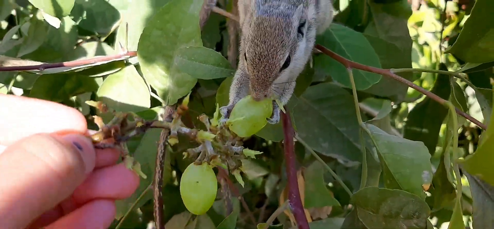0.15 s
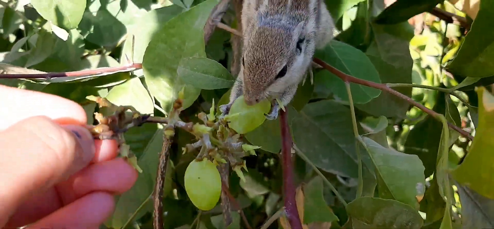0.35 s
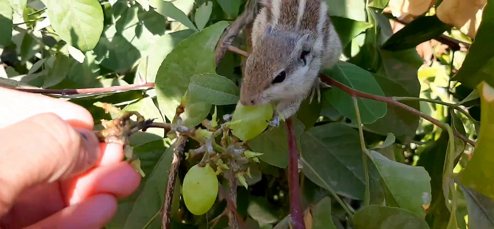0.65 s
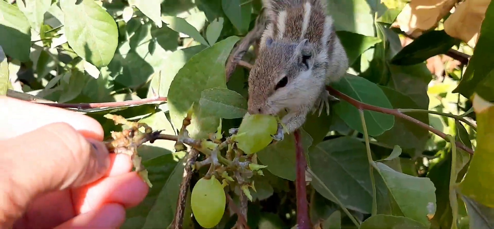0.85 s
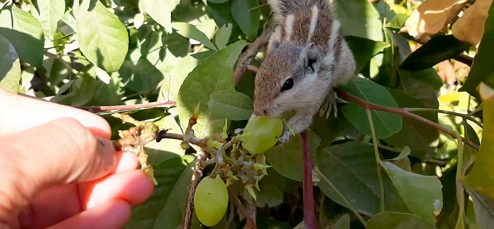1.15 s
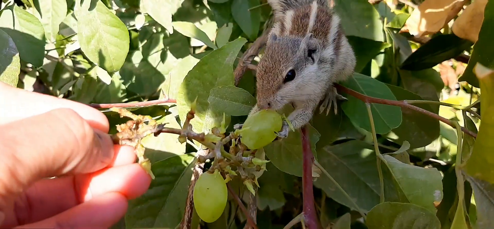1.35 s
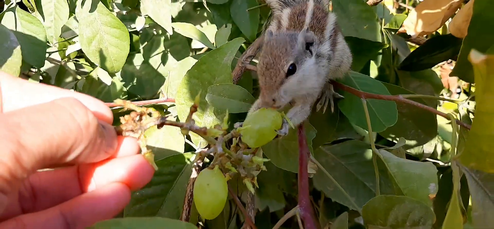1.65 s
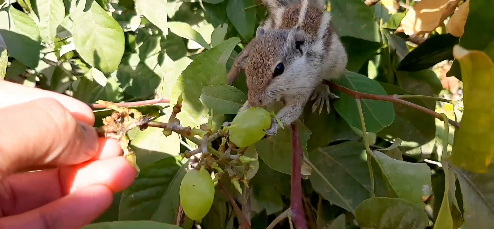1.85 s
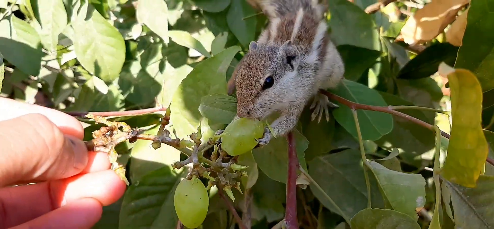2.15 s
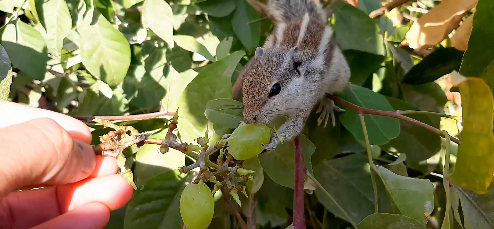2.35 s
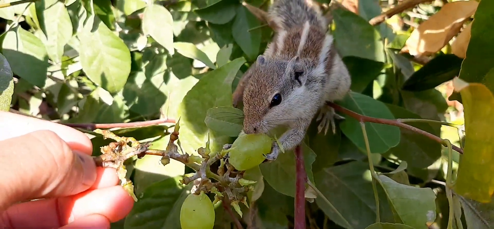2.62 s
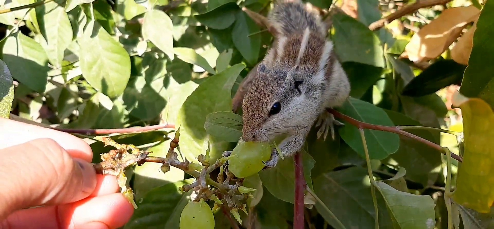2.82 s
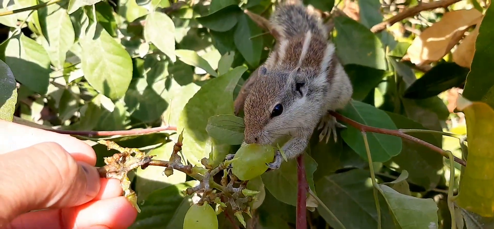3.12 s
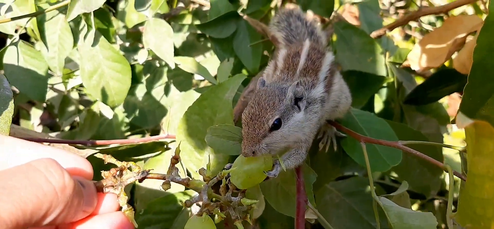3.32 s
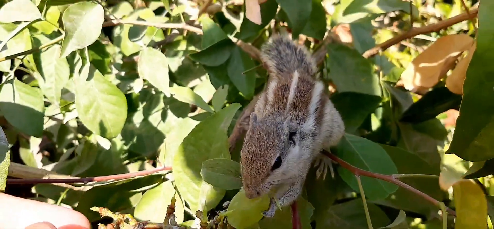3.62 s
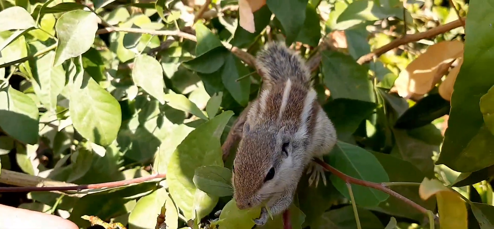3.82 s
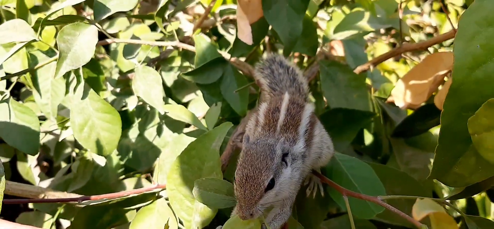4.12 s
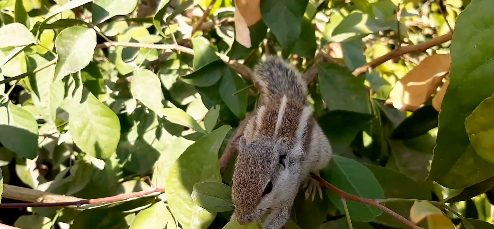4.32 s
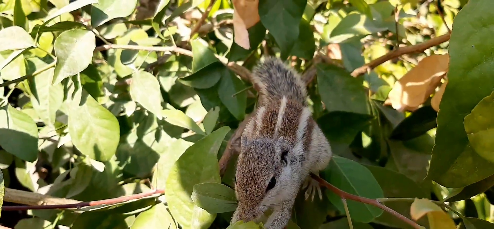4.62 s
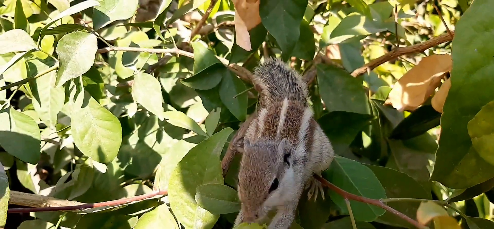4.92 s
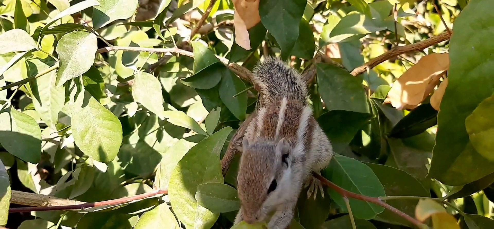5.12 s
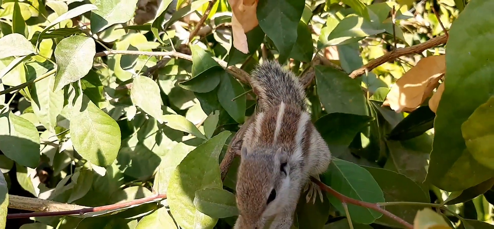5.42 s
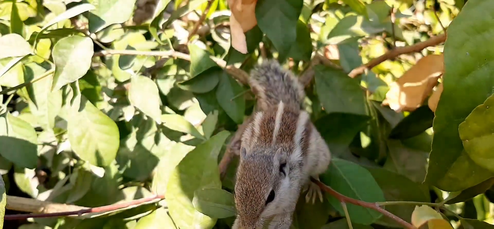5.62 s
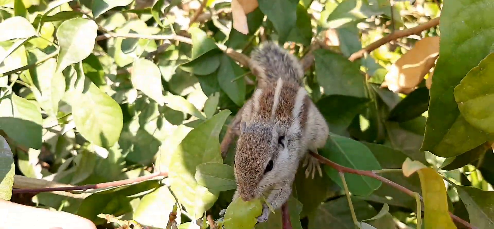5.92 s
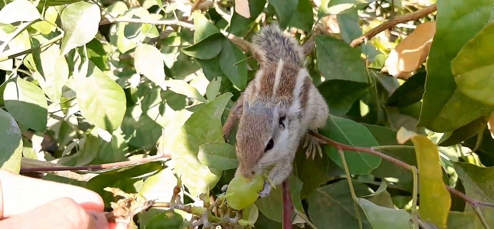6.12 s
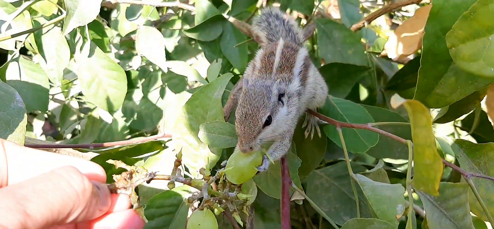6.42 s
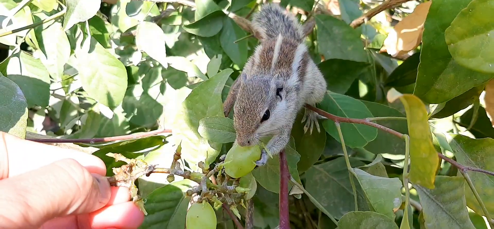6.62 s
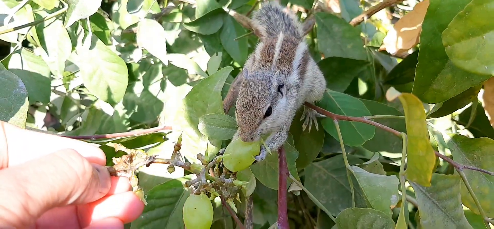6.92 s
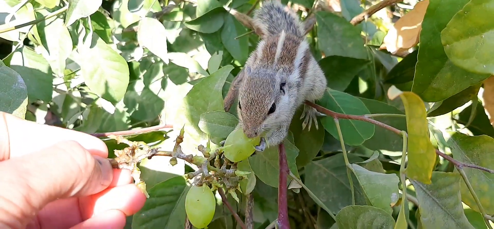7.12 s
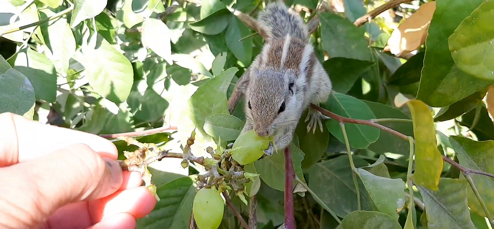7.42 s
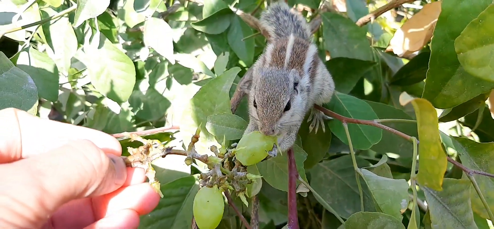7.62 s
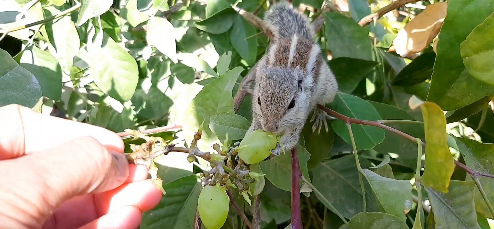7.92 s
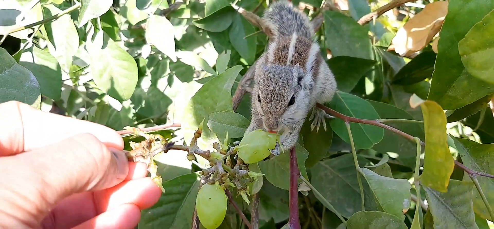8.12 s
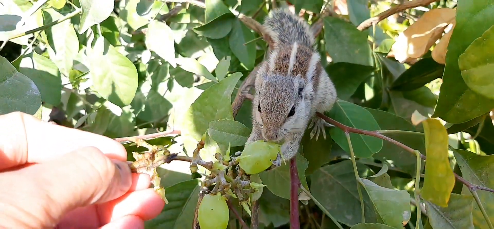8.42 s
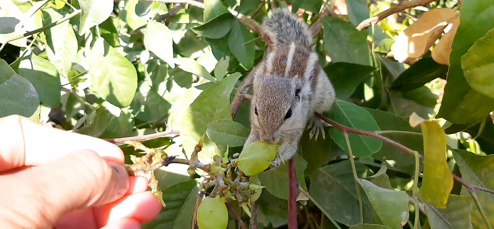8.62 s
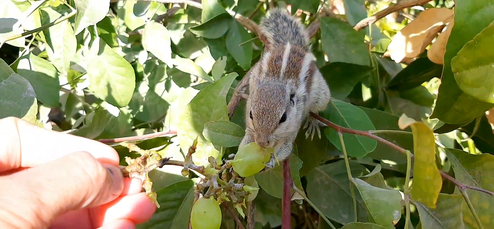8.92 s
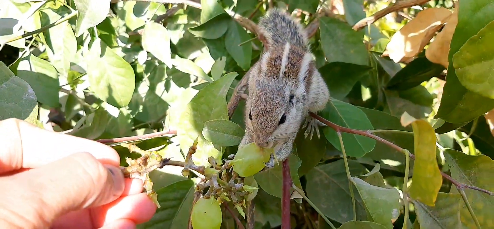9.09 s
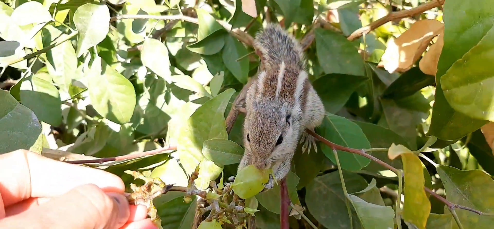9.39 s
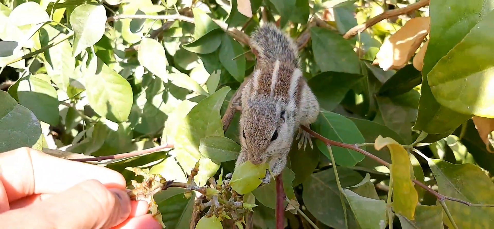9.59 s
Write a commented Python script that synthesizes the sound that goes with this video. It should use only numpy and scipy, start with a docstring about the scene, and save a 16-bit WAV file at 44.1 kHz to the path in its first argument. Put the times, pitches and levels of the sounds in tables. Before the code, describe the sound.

A small palm squirrel repeats sharp, high chirps in quick runs of three or four, close by in a leafy garden with faint wind.

```python
"""Light wind rumbles from the start over a distant wash, thin whines and leaf hiss: all shaped noise.
A palm squirrel soon chirps close by in a bush, in runs of three or four that sink in pitch; each chirp is one
whistle arching up and down in about 25 ms. A second caller slips in shriller squeaks, gliding partials too.
Leaves and garden answer with decaying noise echoes. Faint harmonic calls, then hollow noise swells, come from afar.
Later, loud shrill chirps overload the microphone into low thumps (timed pulses), and noise gusts buffet it."""
import sys
import numpy as np
from scipy import signal
from scipy.fft import rfft, irfft, next_fast_len
from scipy.io import wavfile
from scipy.ndimage import uniform_filter1d, map_coordinates

SR = 44100
rng = np.random.default_rng(int(sys.argv[2]) if len(sys.argv) > 2 else 0)


def output_pcm(signal):
    """Save a mono or channel-first signal as 16-bit PCM at the path in sys.argv[1].

    Samples are clipped to [-1, 1] before scaling.
    """
    pcm = np.clip(np.atleast_2d(signal).T, -1, 1) * 32767
    wavfile.write(sys.argv[1], SR, np.round(pcm).astype(np.int16))


N = 429969


def amp(db):
    """Logarithmic level: decibels to a pressure ratio."""
    return 10 ** (np.asarray(db) / 20)


def unit(x):
    """Energy normalization: scale to rms 1."""
    return x / np.sqrt(np.mean(x ** 2) + 1e-20)


def along(points, hz):
    """Logarithmic frequency scale: read (frequency, value) points along it."""
    f, v = np.transpose(points)
    return np.interp(np.log(hz + 1), np.log(f + 1), v)


def curves(rows, at):
    """Linear interpolation: read each column after the first at the given places."""
    s, *cols = np.transpose(rows)
    return [np.interp(at, s, c) for c in cols]


def wobble(rate, size):
    """Band-limited fluctuation: a smooth random curve with rate knots a second."""
    knots = rng.standard_normal(int(size * rate / SR) + 4)
    return map_coordinates(knots, [np.arange(size) * rate / SR])


def filtered(x, response):
    """Linear filtering: multiply the spectrum by a response of frequency."""
    m = next_fast_len(x.shape[-1] + 8192)
    spectrum = rfft(x, m) * response(np.fft.rfftfreq(m, 1 / SR))
    return irfft(spectrum, m)[..., :x.shape[-1]]


def add(track, s, sound):
    """Superposition: mix a stereo sound into the track at time s."""
    part = track[:, max(round(s * SR), 0):][:, :sound.shape[-1]]
    part += sound[..., :part.shape[-1]]


# Likeness of left and right in diffuse noise: (frequency [Hz], correlation [-1..1])
STEREO_CORRELATION = [(60, 1), (250, 0.9), (1000, 0), (4000, 0)]


def rush(spectrum, patchy_db):
    """Diffuse noise field: stereo noise of rms 1, with random patches in time and frequency."""
    z = signal.stft(rng.standard_normal((2, N)), nperseg=512)[2]
    field = rng.standard_normal(z.shape[1:])
    field = uniform_filter1d(uniform_filter1d(field, size=5, axis=0), size=16, axis=1)
    pair = signal.istft(z * amp(patchy_db * unit(field)), nperseg=512)[1][:, :N]

    def mid_side(hz):
        # sharing power between sum and difference sets the correlation
        turn = np.arccos(np.clip(along(STEREO_CORRELATION, hz), -1, 1)) / 2
        return amp(along(spectrum, hz)) * [np.cos(turn), np.sin(turn)]

    mid, side = filtered(pair, mid_side)
    return unit(np.array([mid + side, mid - side]))


# Slow course of the air: (time [s], relative rumble level [dB], relative wash level [dB])
AIR_COURSE = [(0.0, -52, -58), (1.68, -56, -58.5), (1.93, -53, -58), (5.4, -49.5, -57), (5.89, -56, -60),
              (6.76, -44, -58.5), (7.11, -55.5, -58.5), (7.36, -52, -58), (7.85, -60, -63.5),
              (9.01, -48.5, -56), (9.42, -46, -60.5), (9.75, -58, -59.5)]
# Stirring of the leaves: (time [s], hiss level [dB])
LEAF_COURSE = [(0, -64), (1.4, -65.5), (2.1, -69), (3.8, -66.5), (6.5, -73), (7.2, -60.5), (7.9, -75),
               (9.2, -66), (9.75, -88)]
# Noise spectra of rumble, distant wash and leaf hiss: (frequency [Hz], relative density [dB per Hz])
RUMBLE_SPECTRUM = [(15, -45), (25, -27), (56, 0), (80, 3.5), (193, 0.5), (227, -0.5), (281, -5), (335, -23),
                   (500, -19.5), (650, -38.5), (1100, -120)]
WASH_SPECTRUM = [(180, -36), (300, 0.5), (339, -3.5), (729, -4.5), (1220, -10), (1540, -10.5),
                 (1860, -12.5), (2100, -13.5), (2730, -32), (4620, -120)]
HISS_SPECTRUM = [(1200, -25.5), (2000, -6.5), (3000, 1), (3900, 1), (5500, -7), (7500, -14), (9000, -32),
                 (12000, -10), (16000, -17.5)]
# Faint steady whines: (frequency [Hz], level [dB])
WHINE_TONES = [(1560, -71.5), (3500, -75.5)]


def outdoors(rumble_gain_db=1.0, rumble_top_db=-52, wash_gain_db=3):
    """Spectral shaping of noise: low rumble, distant wash, narrow-band whines and leaf hiss, with swells."""
    t = np.arange(N) / SR
    rumble_db, wash_db = curves(AIR_COURSE, t)
    rumble_db = np.minimum(rumble_db, rumble_top_db) + rumble_gain_db + 0.8 * wobble(7.4, size=N)
    rumble = amp(rumble_db) * rush(RUMBLE_SPECTRUM, patchy_db=2.0) * amp([[.7], [-.7]])
    wash_db = wash_db + wash_gain_db + 0.68 * wobble(5, size=N)
    wash = amp(wash_db) * rush(WASH_SPECTRUM, patchy_db=2.0) * amp([[-1.5], [1.5]])
    whines = 0
    for hz, db in WHINE_TONES:
        band = [(hz * .95, -50), (hz * .985, -4), (hz, 0), (hz * 1.015, -4), (hz * 1.05, -50)]
        whines = whines + amp(db) * rush(band, patchy_db=0)
    hiss = amp(curves(LEAF_COURSE, t)[0]) * rush(HISS_SPECTRUM, patchy_db=1)
    return rumble + wash + swells(t, count=7) + whines + hiss


def whistle(hz, overtones_db, colour, rasp_db):
    """Harmonic synthesis: a slightly rough glide, each partial coloured at its own frequency, plus noise."""
    size = len(hz)
    phase = 2 * np.pi * np.cumsum(hz * (1 + .012 * wobble(1500, size=size))) / SR
    tone = 0
    for k, db in enumerate([0, *overtones_db], 1):
        below_nyquist = np.clip((SR / 2 - k * hz) / 2000, 0, 1)  # fades a partial before it would alias
        tone = tone + amp(db + along(colour, k * hz)) * below_nyquist * np.sin(k * phase)
    flutter = amp(2.5 * wobble(700, size=size))
    noise = rng.standard_normal(size)
    rasp = unit(filtered(noise, lambda f: amp(along(colour, f)) / (1 + (2400 / (f + 1)) ** 8)))
    return np.sqrt(2) * tone * flutter + amp(rasp_db) * rasp


# Colour of the garden's tail: (frequency [Hz], relative level [dB])
TAIL_COLOUR = [(2000, -4.5), (3000, 3.5), (3600, 3), (4500, 0.5), (6000, 0.5), (8000, -3), (11000, -1.5),
               (16000, -0.5)]
# Decay of the garden's tail: (frequency [Hz], time to fall 60 dB [s])
TAIL_T60 = [(2000, 0.61), (4000, 0.33), (6000, .33), (8000, 0.25), (11000, 0.29), (16000, 0.034)]


def bush(call, leaves_db, leaves_t60, garden_db, lead):
    """Impulse response: direct call, early leaf scatter and late garden tail; lead [s] favours the left port."""
    t = np.arange(SR // 2) / SR
    delay = .001 + np.array([[-lead], [lead]]) / 2
    direct = np.sinc((t - delay) * SR) * (t < .002)
    # cubed noise makes sparse, spiky reflections
    scatter = rng.standard_normal((2, len(t))) ** 3 * amp(-60 * t / leaves_t60) * (t > .0015)
    hz, frames, z = signal.stft(rng.standard_normal((2, len(t))), SR, nperseg=256)
    tail_db = along(TAIL_COLOUR, hz)[:, None] - 60 * frames / along(TAIL_T60, hz)[:, None]
    tail = signal.istft(z * amp(tail_db), SR, nperseg=256)[1][:, :len(t)] * (t > .004)
    echoes = amp(leaves_db) * unit(scatter) + amp(garden_db) * unit(tail)
    return signal.fftconvolve(call[None], direct + echoes / np.sqrt(len(t)), axes=1)


# Colour of the chirps, with a sharp treble peak: (frequency [Hz], relative level [dB])
CHIRP_COLOUR = [(2000, -7.5), (2550, -3.5), (3000, -5.5), (3600, 4), (4400, 2), (5200, -2.5), (6800, -7.5),
                (7500, -2), (8000, 8.5), (8700, -14.5), (9700, -21), (11200, -14), (13000, -13.5),
                (14000, -11), (15600, -7), (17000, -28.5)]
# Places in a chirp: (phase [-1 start, 0 apex, 1 end])
PHASES = [-1, -.7, -.35, 0, .3, .65, 1]
# Loudness of the chirp at each of those places: (relative level [dB])
CHIRP_LEVEL = [-7, -1, -5.5, -2.5, -2, -1.5, -2]
# Second harmonic at each of those places: (relative level [dB])
SECOND_HARMONIC = [-12, -4, 1.5, -7, -2, -8, -18.5]


def chirp(t, apex_hz, rise, fall, accent_db, start_hz=2380, end_hz=3680,
          rise_width=.68, fall_width=.53, roundness=2.3):
    """Frequency modulation: a whistle shoots to a rounded apex, then slides down; higher ones end higher."""
    u = np.where(t < 0, t / rise, t / fall)
    foot_hz = np.where(t < 0, start_hz, end_hz * (apex_hz / 6000) ** .3)
    arch = np.exp(-abs(u / np.where(t < 0, rise_width, fall_width)) ** roundness)
    hz = foot_hz * (apex_hz / foot_hz) ** arch
    fade_db = -32 * np.maximum(-u - 1, 0) - 70 * np.maximum(u - 1, 0)  # soft onset and ending
    accent = accent_db * np.exp(-(u / 0.32) ** 2)
    level = amp(np.interp(u, PHASES, CHIRP_LEVEL) + fade_db + accent)
    overtones_db = [np.interp(u, PHASES, SECOND_HARMONIC), -11]
    return level * whistle(hz, overtones_db, CHIRP_COLOUR, rasp_db=-7.0)


# the first, the middle and the last chirps of a run: (relative level [dB], accent at the apex [dB])
OPENING, MIDDLE, CLOSING = (-2.95, -3), (0, 1.5), (-3.5, 0.36)
URGENT_ACCENT_DB, URGENT_STRETCH = 3, .14  # urgent chirps peak harder and climb for longer
RISE_S, FALL_S, FALL_AT_HZ = .0092, .0148, 7010  # rise at urgency 1; fall at this apex, longer from higher


def run_of_chirps(start, end, count, wait, first_hz, last_hz, urgency, db):
    """Rhythm and pitch contour: even chirps with a held-back last; urgency above 1 delays the sinking."""
    last = round(count) - 1
    gap = (end - start - wait) / last
    for k in range(last + 1):
        step_db, accent_db = OPENING if k == 0 else CLOSING if k == last else MIDDLE
        s = start + k * gap + wait * (k == last)
        apex_hz = first_hz + (last_hz - first_hz) * (k / last) ** urgency
        rise = RISE_S * urgency ** URGENT_STRETCH
        fall = FALL_S * apex_hz / FALL_AT_HZ
        yield s, apex_hz, rise, fall, db + step_db, accent_db + URGENT_ACCENT_DB * np.log(urgency)


# Runs of chirps: (first apex [s], last apex [s], chirps [count], extra wait before the last [s],
# first apex pitch [Hz], last apex pitch [Hz], urgency [1 = even fall of pitch],
# relative level [dB], brightness [dB])
CHIRP_RUNS = [(0.2776, 0.483, 4, 0.011, 8130, 5770, 1.1, -23, 1.5),
              (.9555, 1.098, 3, .008, 8110, 5780, 1.1, -23, -1),
              (1.6628, 1.8033, 3, 0.0066, 7940, 5890, .5, -22.5, 0),
              (2.2448, 2.392, 3, 0.014, 7720, 5505, 0.6, -23, 0),
              (2.8111, 2.95, 3, 0.0013, 8020, 5706, 0.82, -22, -1),
              (3.3826, 3.5198, 3, 0, 7490, 5960, .45, -21, 0.5),
              (3.9766, 4.115, 3, 0.008, 7420, 5846, 0.64, -22.5, 0.5),
              (4.5478, 4.691, 3, 0.0072, 7900, 5760, 0.43, -21.5, -0.5),
              (5.201, 5.4032, 4, .013, 7550, 5850, .45, -21.5, 1),
              (6.11, 6.255, 3, 0.0072, 7440, 6065, .7, -23, -0.5),
              (6.8210, 6.9576, 3, 0.011, 8014, 6810, 2.2, -20, 2.5),
              (7.4017, 7.5378, 3, 0.011, 7880, 6030, 1, -22.5, 1),
              (8.1307, 8.263, 3, 0.01, 8570, 5920, .45, -21.5, -2),
              (8.7826, 8.9066, 3, 0.014, 6775, 5520, 1.2, -23, -2.5),
              (9.434, 9.6136, 4, 0.015, 8230, 5950, 4.1, -21.5, -1.5)]
BRIGHT_FROM_HZ = 4600  # brightness lifts or lowers what lies above this


def squirrel(gain_db=0.0, garden_db=-11):
    """Source and path: the near squirrel's runs, each treble-shelved, pass through the bush."""
    out = np.zeros((2, N))
    t = np.arange(-SR // 40, SR // 30) / SR
    for *run, bright_db in CHIRP_RUNS:
        treble = lambda hz: amp(bright_db * hz ** 8 / (hz ** 8 + BRIGHT_FROM_HZ ** 8))
        for s, apex_hz, rise, fall, db, accent_db in run_of_chirps(*run):
            call = amp(db + gain_db) * filtered(chirp(t, apex_hz, rise, fall, accent_db), treble)
            heard = bush(call, leaves_db=0.0, leaves_t60=0.041, garden_db=garden_db, lead=0.00018)
            add(out, s + t[0] - .001, heard)  # the bush delays by 1 ms
    return out


# Colour of the squeaks: (frequency [Hz], relative level [dB])
SQUEAK_COLOUR = [(2300, -11), (3200, -4.5), (4500, -6), (6500, -8), (8500, -12), (10300, -8), (12000, -7.5),
                 (14000, -7.5), (15700, -3.5), (17000, -11.5)]
# Course of one squeak: (time [s], share of the reference pitch [ratio], relative level [dB])
SQUEAK_COURSE = [(-.013, .18, -22), (-.009, .25, -4.5), (-.005, .29, 1), (-.002, 0.65, 0), (.001, 0.57, 7),
                 (.005, .81, -3.5), (.011, .97, -2), (.017, .93, -4.5), (.021, .6, -13.5),
                 (.025, 0.22, -4.5)]
# Bursts of squeaks: (time [s], squeaks [count], first gap [s], relative level [dB])
BURSTS = [(0.858, 2, .080, -27), (3.313, 2, .077, -25.5), (5.292, 2, 0.073, -25), (5.944, 2, .083, -28.5),
          (6.668, 2, .082, -28.5), (8.528, 3, .077, -26.5), (9.434, 2, .085, -27.5)]
SQUEAK_FIRST_HZ, SQUEAK_LATER_HZ = 17050, 15940  # reference pitches: the opening squeak reaches highest
SQUEAK_FIRST_DB, SQUEAK_SLOWING_S = -2, .021  # it is softer; each gap is longer than the one before


def shrill_caller(garden_db=0):
    """Frequency modulation: bursts of squeaks sweep to about 16 kHz, with strong scatter from the foliage."""
    out = np.zeros((2, N))
    t = np.arange(-SR // 70, SR // 35) / SR
    share, level_db = curves(SQUEAK_COURSE, t)
    share = uniform_filter1d(share, size=70)
    swell = amp(level_db) * signal.windows.tukey(len(t), .2)
    for start, count, gap, db in BURSTS:
        for k in range(round(count)):
            s = start + k * gap + SQUEAK_SLOWING_S * k * (k - 1) / 2
            top_hz, step_db = (SQUEAK_LATER_HZ, 0) if k else (SQUEAK_FIRST_HZ, SQUEAK_FIRST_DB)
            squeak = swell * whistle(top_hz * share, [-12], SQUEAK_COLOUR, rasp_db=-14.5)
            call = amp(db + step_db) * squeak
            heard = bush(call, leaves_db=2.5, leaves_t60=0.0089, garden_db=garden_db, lead=0.00017)
            add(out, s + t[0] - .001, heard)
    return out


# Faint calls from far off: (time [s], length [s], pitch [Hz], glide [share of pitch],
# centre of the band [Hz], width of the band [Hz], relative level [dB])
DISTANT_CALLS = [(1.18, 0.09, 1288, -0.00083, 4960, 1290, -51.5),
                 (3.105, 0.16, 842, 0.062, 4800, 2270, -52.5), (4.218, 0.085, 4150, 0.06, 4150, 500, -50),
                 (4.362, 0.11, 975, 0.0086, 4330, 2400, -56), (7.065, 0.3, 399, -0.028, 2920, 454, -63.5),
                 (7.2, 0.18, 285, -0.038, 1250, 252, -55.5), (9.2, 0.035, 4730, -0.037, 4750, 490, -60)]


def far_calls(distance_db=-11.0):
    """Formant filtering: wavering harmonic stacks in one band, with reverberation above the direct sound."""
    out = np.zeros((2, N))
    for s, length, hz, glide, centre_hz, width_hz, db in DISTANT_CALLS:
        size = int(length * SR)
        waver = .03 * wobble(500, size=size) + 0.032 * wobble(27, size=size)
        course = 1 + glide * np.linspace(-.5, .5, size) + waver
        phase = 2 * np.pi * np.cumsum(hz * course) / SR
        orders = np.arange(1, 8000 // hz + 1)[:, None]
        formant = np.exp(-((orders * hz - centre_hz) / width_hz) ** 2 / 2)
        call = unit((formant * np.sin(orders * phase)).sum(0)) * signal.windows.tukey(size, .85)
        add(out, s, bush(amp(db + distance_db) * call, leaves_db=-5, leaves_t60=.1, garden_db=11.5, lead=0))
    return out


# Spectrum of the hollow swells: (frequency [Hz], relative density [dB per Hz])
HOLLOW_SPECTRUM = [(300, -37), (500, 8), (740, 10), (900, -1.5), (1200, -23.5), (2500, -67.5)]
SWELL_FIRST_S, SWELL_PERIOD_S, SWELL_WIDTH_S, SWELL_DB = 2.01, .6, 0.13, -57.5


def swells(t, count):
    """Amplitude modulation: hollow noise far off swells and fades at an even pace."""
    peaks = SWELL_FIRST_S + SWELL_PERIOD_S * np.arange(count)
    level = sum(np.exp(-((t - s) / SWELL_WIDTH_S) ** 4) for s in peaks)
    return amp(SWELL_DB) * level * rush(HOLLOW_SPECTRUM, patchy_db=2.5)


# Low thumps as loud, shrill chirps overload the microphone: (time [s], peak level on the left [dB])
OVERLOAD_THUMPS = [(6.821, -24.5), (6.885, -16.5), (9.031, -18.5), (9.49, -15.5), (9.546, -22)]


def thumps(push=0.0027, rebound=0.0025):
    """Transient response: the difference of two pulses (time constants [s]), band-passed, mostly left."""
    out = np.zeros((2, N))
    t = np.arange(SR // 10) / SR
    lobe = lambda tau: t / tau ** 2 * np.exp(-t / tau)
    response = lambda hz: (1j * hz / (36 + 1j * hz)) ** 3 / (1 + 1j * hz / 400)
    thump = filtered(lobe(push) - lobe(rebound), response)
    for s, db in OVERLOAD_THUMPS:
        add(out, s, amp(db) * thump / abs(thump).max() * amp([[0], [-14]]))
    return out


# Gusts on the left port: (time of the peak [s], half length [s], relative level [dB])
GUST_TIMES = [(8.507, 0.65, -47.5), (8.985, 0.1, -32.5), (9.207, 0.042, -31.5), (9.662, .3, -42.5)]
# Spectrum of the gusts: (frequency [Hz], relative density [dB per Hz])
GUST_SPECTRUM = [(20, -41), (45, -1.5), (80, -1), (170, -3.5), (280, -31), (600, -49), (1500, -65.5)]


def buffeting():
    """Amplitude-modulated low noise: late on, a few lumpy gusts catch mainly the left port."""
    t = np.arange(N) / SR
    strength = sum(amp(db) * np.exp(-np.square((t - s) / half)) for s, half, db in GUST_TIMES)
    lumps = amp(3.5 * wobble(25, size=N))
    return strength * lumps * rush(GUST_SPECTRUM, patchy_db=-0.5) * amp([[0], [-15]])


# Level difference of the ports: (frequency [Hz], left minus right [dB])
PORT_LEVEL = [(2400, -6.5), (4400, -2.5), (6000, -2), (8100, 7), (11000, -1.5), (15000, 1.5)]
# Phase difference of the ports: (frequency [Hz], left minus right [rad])
PORT_SHIFT = [(3000, -.1), (5500, 0), (8000, -.7), (11000, -0.1), (15000, 0)]


def scene():
    """Superposition: both callers, coloured differently at the two ports, over the garden air."""
    half = np.array([[.5], [-.5]])
    ports = lambda hz: amp(along(PORT_LEVEL, hz) * half) * np.exp(1j * along(PORT_SHIFT, hz) * half)
    callers = filtered(squirrel() + shrill_caller(), ports)
    return outdoors() + callers + far_calls() + thumps() + buffeting()


TOP_HZ = 16150  # upper band limit


def record(dry):
    """Clipping and band limitation: full scale bounds the wave, then a steep low-pass ends the treble."""
    return filtered(np.clip(dry, -1, 1), lambda hz: 1 / (1 + (hz / TOP_HZ) ** 160))


dry = scene()
out = record(dry)
output_pcm(out)
```